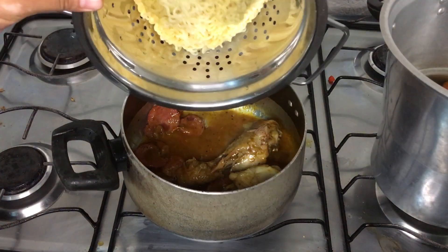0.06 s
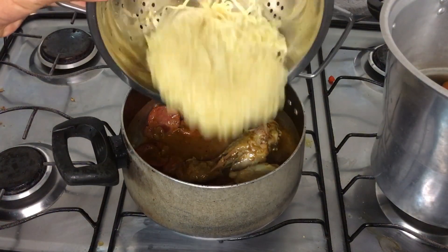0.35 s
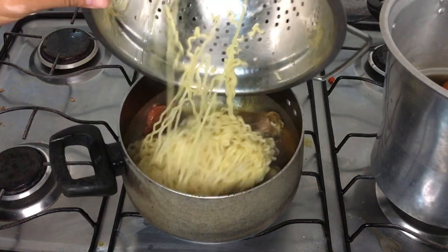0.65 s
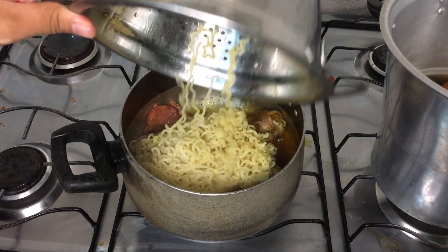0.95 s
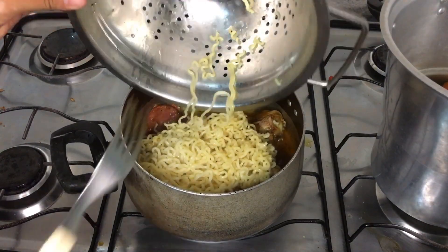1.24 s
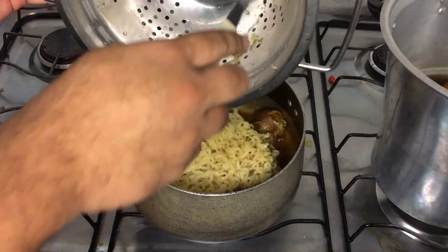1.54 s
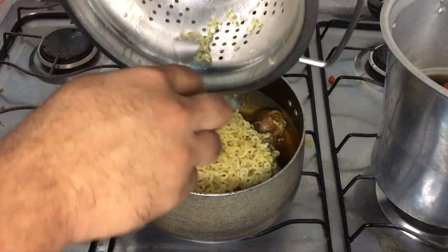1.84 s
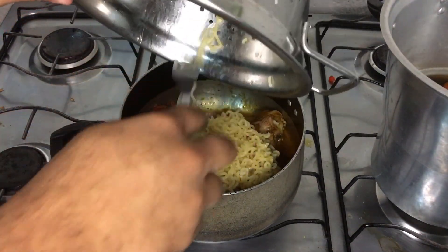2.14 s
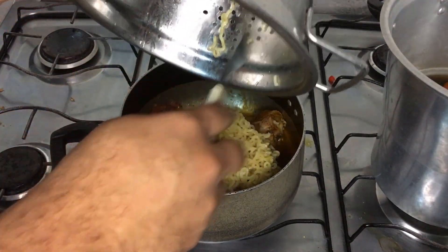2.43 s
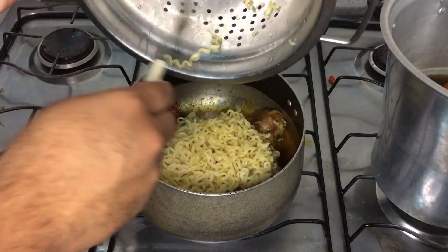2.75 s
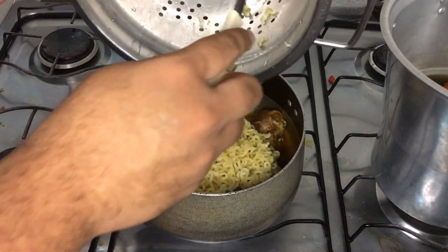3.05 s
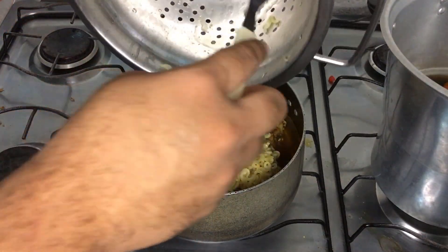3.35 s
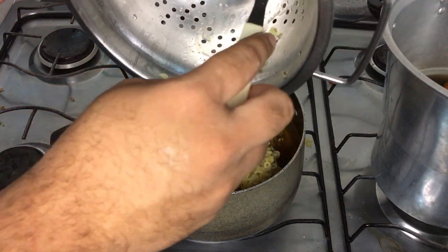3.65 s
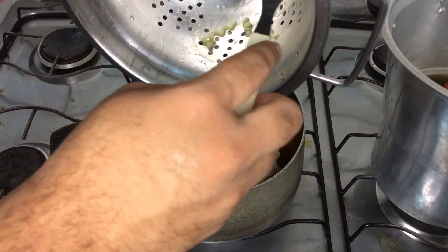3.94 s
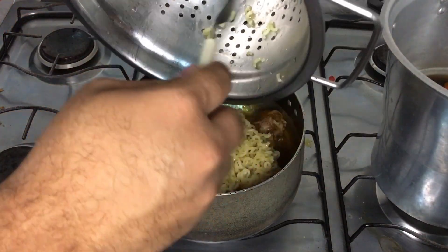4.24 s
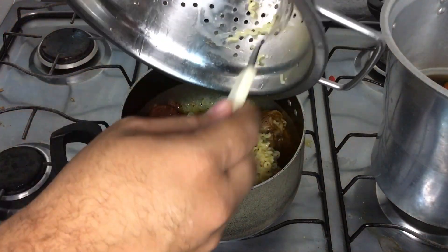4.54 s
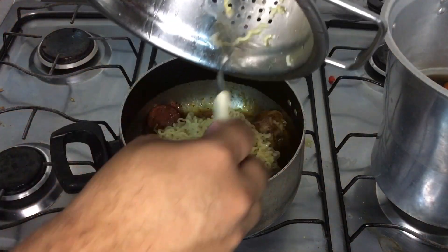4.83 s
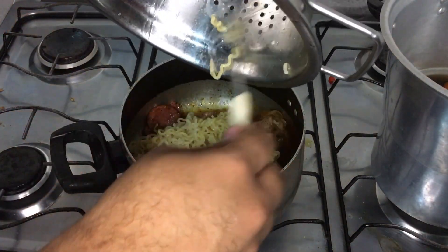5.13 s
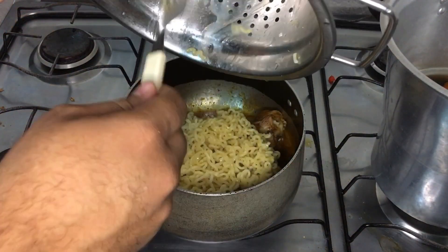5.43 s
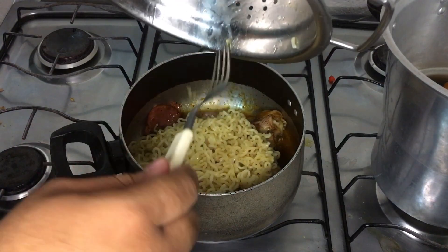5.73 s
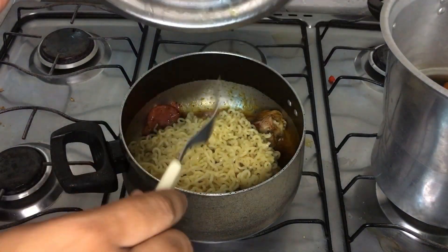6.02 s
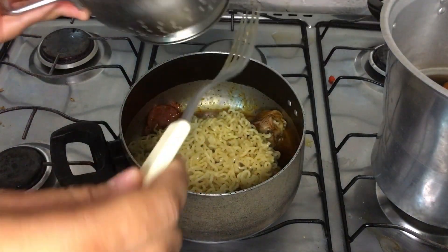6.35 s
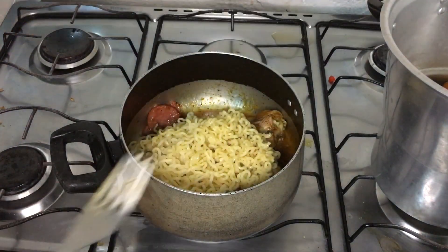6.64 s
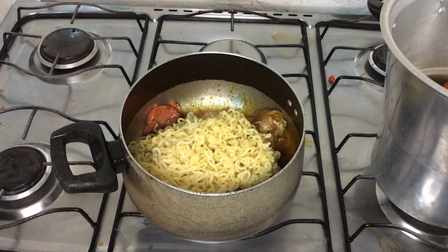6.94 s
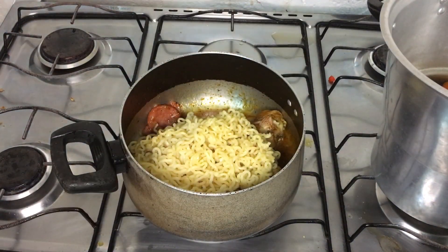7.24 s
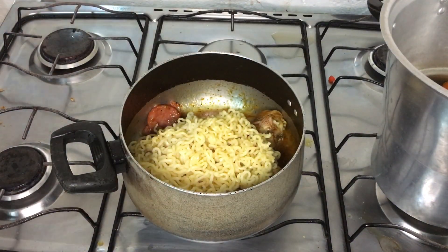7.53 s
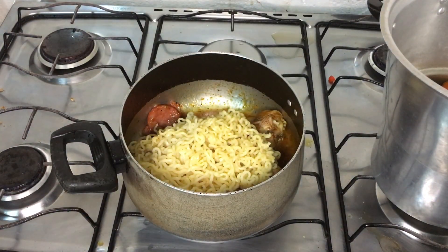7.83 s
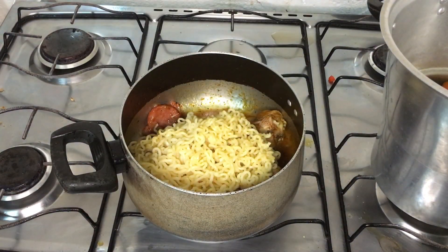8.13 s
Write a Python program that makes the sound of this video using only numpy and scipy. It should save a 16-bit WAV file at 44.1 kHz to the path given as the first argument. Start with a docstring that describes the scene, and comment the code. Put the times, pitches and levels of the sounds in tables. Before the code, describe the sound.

Wet noodles plop into a pot, then a fork taps and scrapes a ringing steel colander over a faint gas burner.

```python
"""Noodles from colander to pot

Small kitchen, gas stove. A steel colander knocks on the pot; cooked noodles slide in and land as one
wet lump, and the stove top booms. A fork taps and scrapes the last strands loose, ringing the steel's
modes. The colander is set on the counter and rocks. Behind: burner, simmer, cloth, faint chirps."""
import sys
import numpy as np
from scipy import signal
from scipy.fft import rfft, irfft
from scipy.io import wavfile
from scipy.ndimage import uniform_filter1d

SR = 44100
rng = np.random.default_rng(int(sys.argv[2]) if len(sys.argv) > 2 else 0)


def dump(signal):
    """Clip the signal to [-1, 1] and save it as 16-bit WAV at the path in sys.argv[1]."""
    limited = np.clip(np.atleast_2d(signal).T, -1, 1)
    pcm = np.round(limited * 32767).astype(np.int16)
    wavfile.write(sys.argv[1], SR, pcm)


N = 369558
RING_T = np.arange(int(.7 * SR)) / SR

# Blows on steel: (time [s], strength [dB], contact pitch [Hz], wall gain [dB], low gain [dB],
# rim gain [dB], wall resonance [Hz], treble resonance [Hz])
FORK_TAPS = [(1.634, -24.5, 8550, -2.5, 0.5, -10, 3130, 6830), (1.669, -33, 9000, 6, 4.5, -7, 3350, 7130),
             (1.768, -28.5, 12200, 5.5, -2, -9, 4170, 11500), (1.804, -16, 9900, 5.5, 4, -2, 5500, 8140),
             (1.86, -28, 10600, -4, -9.5, -8, 3250, 8600), (2.064, -23, 9400, -8, 4, -16.5, 3700, 6100),
             (2.152, -18, 9800, 7.5, -1, -3, 4700, 6900), (2.159, -21.5, 8000, 6.5, -6, -10, 5140, 7030),
             (2.216, -20.5, 9800, 8.5, 3, -10, 2160, 11100), (2.441, -23, 8600, -9, 0, -22, 3400, 8300),
             (2.489, -17.5, 9100, 6, -3, -22, 3240, 9100), (2.524, -22.5, 6400, 7, 12, -13.5, 4030, 6200),
             (2.792, -20.5, 6340, -3.5, 6.5, -20, 3480, 7000), (3.208, -25, 7800, -7, 8, -14, 2930, 7960),
             (3.264, -35.5, 9700, -1.5, -12, -16, 2100, 6440),
             (3.491, -24.5, 8900, 1, 4.5, -11, 5250, 9100), (3.577, -22.5, 10500, 1, -10, -23, 3130, 9100),
             (3.783, -28, 10200, 3.5, 15, -6, 2480, 8200), (3.79, -29.5, 8140, 12, 6, -3, 3280, 7240),
             (3.796, -27.5, 9600, 2, 7, 9, 2400, 7400), (4.142, -18, 11100, -3, 0.5, -22, 3400, 11800),
             (4.445, -20, 9600, -9, -4, -4, 3250, 8330), (4.463, -23, 11700, -0.5, -11, -4, 4330, 8800),
             (4.547, -24.5, 8640, -7, -3.5, 11, 4270, 8900), (4.69, -26.5, 9300, -4, -8, 7, 3060, 9000),
             (4.762, -31, 11500, -2, -24, 0, 3080, 8850), (4.859, -17.5, 7170, -5, 5, -14, 2050, 6050),
             (5.102, -13.5, 9900, 14.5, 11.5, 6.5, 4000, 11600),
             (5.276, -40.5, 7000, -2, -12, 0, 4030, 6870), (5.545, -18.5, 7460, 1.5, -4, 5.5, 4100, 8700),
             (5.656, -29.5, 8000, 3, -17, 15, 2900, 7300)]
POT_KNOCKS = [(0.007, -29, 8750, 5.5, -5, 8.5, 4030, 6000), (0.06, -42.5, 9350, 8, 3, 9, 3960, 6850),
              (0.16, -38, 9600, -6, -1, 3, 2130, 6600), (0.439, -51, 10000, 1, -8, 8, 2665, 9000),
              (0.49, -32.5, 7400, 5.5, -1, 0, 3000, 7100)]
SETTLING_KNOCKS = [(8.061, -48, 9400, 1, 4, 0, 5170, 9100), (8.248, -42.5, 10000, -2, -4, 9, 3960, 9150),
                   (8.315, -45.5, 10000, -5, -5, 2, 2050, 8800), (8.358, -52, 10500, 2, -3, -3, 2100, 8900)]
# Edges of five registers, low, wall and three treble: (frequency [Hz])
REGISTER_EDGES_HZ = [150, 1700, 5500, 7800, 10500, 17000]
# Average blow, per register: (level [dB])
FORK_BALANCE_DB = [-24.5, -12.5, -1.5, 1, 1]
POT_BALANCE_DB = [10.5, 2.5, -1, 0.5, 0.5]
SETTLING_BALANCE_DB = [2, 4, -2, 1, 0.5]
# Hand jabs and damps, then flicks along the rim: (time [s], push [dB], root of damping t60 factor [-])
FORK_HAND = [(1.8, 1.5, 0.29), (2.06, 7.5, 0.77), (2.5, 2, 1.0), (2.8, 5, 0.59), (3.2, 10, 0.26),
             (3.58, -2, 0.16), (3.8, 12, 0.22), (4.45, -10, 0.28), (4.6, -23, 0.33), (5.1, -3, 0.53),
             (5.55, -6, 1.0)]
# Tines over the holes: (start [s], end [s], level [dB], wall gain [dB])
SCRAPE_STROKES = [(1.662, 1.701, -42.5, 11.5), (1.715, 1.772, -37.5, 7), (1.836, 1.911, -37.5, -21),
                  (2.091, 2.225, -36, 0), (2.455, 2.55, -32.5, 3), (2.847, 2.938, -44, 4),
                  (3.225, 3.264, -37, -10), (4.153, 4.205, -41, -12), (4.484, 4.555, -40.5, -7),
                  (4.721, 4.93, -39, -4), (5.203, 5.297, -41.5, -6), (5.594, 5.654, -42, 0)]
# Wet steel squeak: (time [s], level [dB])
SQUEAK_ENVELOPE = [(1.68, -73), (1.72, -61), (1.755, -40.5), (1.79, -58.5)]
# Sauce smacks: (time [s], relative level [dB], frequency [Hz])
SAUCE_SMACKS = [(0.463, -40, 2600), (0.608, -26, 2300), (0.695, -24, 2800), (0.713, -24, 3700),
                (0.725, -20, 1010), (0.727, -24, 258), (0.775, -25.5, 2200), (0.8124, -32, 1900),
                (0.963, -36.5, 6400)]
# Cook's movements: (start [s], length [s], level [dB], peak [Hz])
COOK_MOVES = [(1.372, 0.38, -54.5, 1640), (6.171, 0.36, -54.5, 1560), (6.742, 0.27, -61, 1500),
              (7.174, .2, -61, 2500), (7.597, 0.32, -64.5, 1500)]

# Clear modes of the vessels: (frequency [Hz], level [dB], t60 [s])
COLANDER_MODES = [(700, -1, .25), (780, 1, .3), (886, 8, .65), (1037, 3, .4), (1233, 7, .55),
                  (1830, -1, .55), (2024, 4, .55), (2307, 9, .22), (2426, 8, .2), (2449, 9, .28),
                  (2900, 3, .65), (3500, 6, .35), (3988, 6, .25), (4015, 3, .9), (4130, 2, .5),
                  (4662, 0, .2), (5150, 6, .18), (5576, 3, .26), (5845, 5, .28), (6088, 9, .42),
                  (6160, 4, .22), (6430, 9, .25), (6815, 9, .28), (7060, 13, .32), (8127, 6, .28),
                  (8600, 7, .2), (9060, 5, .18), (10798, 6, .25), (11458, 5, .25), (13680, 5, .25)]
POT_MODES = [(400, 0, .7), (535, 1, .8), (695, -3, .4), (868, 2, .55), (1020, 4, .4), (1110, 2, .3),
             (1322, 2, .35), (1361, 6, .45), (1420, 8, .35), (1675, 3, .35), (2030, 5, .35), (2665, 3, .45),
             (2902, 7, .3), (3005, 9, .13), (3105, 9, .16), (4001, 3, .35), (4694, -1, .15), (5103, 9, .34),
             (5300, 8, .35), (5540, 4, .3), (6288, 9, .2), (6850, 10, .2)]
RESTING_MODES = [(1000, 3, .3), (1370, 3, .2), (1560, -10, .12), (2070, 0, .25), (2320, -5, .3),
                 (4200, -10, .15), (5420, -14, .15)]  # colander on the counter
# Their crowds of short-lived modes: (frequency [Hz], level [dB])
COLANDER_SPECTRUM = [(150, -17), (500, -17), (850, 0), (1600, -3.5), (2300, 0), (2700, -1.5), (3200, 3.5),
                     (3750, -2), (4100, 0.5), (5500, 1), (6200, 13.5), (7000, 12), (7800, 0), (8800, 10.5),
                     (10300, -1.5), (16000, 2)]
POT_SPECTRUM = [(150, -21), (450, 6.5), (700, 7), (1000, 4), (1450, 6.5), (2250, 1), (2650, 4), (3050, -1),
                (3300, 2.5), (3950, 7.5), (4450, 3), (4900, 3), (5200, 8.5), (5900, 10), (6750, 15.5),
                (7800, -9.5), (8800, -7.5), (16000, -20)]
RESTING_SPECTRUM = [(150, -1), (600, 0), (1100, 3), (1500, 4), (1800, -4), (2250, 10.5), (2700, 3),
                    (4000, 2), (6000, -7), (9000, -3), (16000, -5)]
# Low body modes: (frequency [Hz], level [dB], t60 [s])
JAB_MODES = [(177, -2.5, 0.07), (253.5, -6.5, 0.28), (294, -4, 0.14), (355, -5.5, 0.13), (407.8, -9, 0.35),
             (537, -11.5, 0.15), (693, -3.5, 0.19)]
STOVE_MODES = [(60, -19, 0.46), (94.85, 0, 2), (140, -9, 4), (207.2, -1.5, 1.44), (242.7, -8.5, 1.6),
               (322, -34, 0.92), (400.4, -7.5, 0.59)]
COUNTER_MODES = [(76.2, 1, 0.63), (96, -0.5, 0.44), (122, -7.5, 0.53), (149, -3.5, 0.44), (236, -11, 0.29)]
FULL_POT_MODES = [(90, 2, 0.35), (219, -9, 0.22), (302, -17, 0.33), (409, -9, 0.37), (543, -8, 0.46),
                  (980, -16, 0.51), (1120, -8.5, 0.37)]
# Blows that drive them: (time [s], level [dB])
FORK_JABS = [(1.803, -52), (2.063, -44.5), (2.441, -53), (3.208, -47), (3.491, -48.5), (3.785, -39.5),
             (4.142, -46.5), (4.445, -50.5), (4.86, -51.5)]
STOVE_BLOWS = [(0.006, -39.5), (0.157, -40), (0.49, -37), (0.714, -36.5)]
COUNTER_BLOWS = [(8.075, -38.5), (8.26, -35.5)]
LUMP_BLOW = [(0.715, -29.5)]
# Noise spectra: (frequency [Hz], level [dB])
THUD_SPECTRUM = [(110, -32), (200, -14.5), (290, -6.5), (420, -14), (550, -15), (720, -21), (1000, -36),
                 (3000, -55)]
NOODLE_SPECTRUM = [(24, -75), (40, 3), (135, 7.5), (182, -3), (216, 2), (541, -7), (597, -7), (1110, -9.5),
                   (1350, -11), (4000, -15.5), (15000, -24)]
CLOTH_SPECTRUM = [(100, -20), (500, -4.5), (1400, -3.5), (3400, -1), (5000, -6), (6500, -6.5), (12000, -7),
                  (16000, -18)]
FLAME_SPECTRUM = [(18, -52), (30, -31.5), (59, 6), (77, -7), (93, -17), (335, -8.5), (362, -17),
                  (523, -15.5), (816, -16.5), (1380, -18), (2500, -23.5), (4860, -29), (6300, -23.5),
                  (8000, -26.5), (9860, -22), (14200, -12.5), (15800, -18.5)]
SLIP_SPECTRUM = [(200, -2.5), (1500, -9), (4500, -8.5), (6200, -6), (9000, 6.5), (12000, 9), (16000, 3.5)]
# Decay: (frequency [Hz], t60 [s])
CROWD_MIN_T60 = [(300, 0.2), (2500, 0.092), (6500, 0.076), (16000, 0.075)]
KITCHEN_T60 = [(100, 0.57), (600, 0.83), (2000, 0.52), (6000, 0.45), (15000, 0.23)]


def strikes(rows, modes, balance_db, level_db, crack_db, crack_t60_s, damping_t60_s, thud_db, thud_t60_s,
            hand=None):
    """Blows on steel: contact crack, damped ring, dull thud of the hand's push."""
    out = np.zeros(N)
    _, _, spectrum = modes
    for time_s, strength_db, pitch_hz, wall_db, low_db, rim_db, wall_hz, treble_hz in rows:
        push_db, hold = hand(time_s) if hand else (0, 1)
        crack = amp(crack_db + push_db) * burst(spectrum, crack_t60_s)
        blow = crack + spot_ring(modes) * fade(RING_T, damping_t60_s * hold ** 2)
        blow = resonance(blow, hz=2385, width_hz=230, gain_db=rim_db)
        blow = resonance(blow, wall_hz, width_hz=180, gain_db=8.5)
        tilt_db = 13.5 * np.log2(pitch_hz / 9270)  # shorter contact, brighter treble
        levels_db = np.add(balance_db, [low_db, wall_db, -tilt_db, 0, tilt_db])
        ring = 0
        for lo_hz, hi_hz, db in zip(REGISTER_EDGES_HZ, REGISTER_EDGES_HZ[1:], levels_db):
            register = band(blow, lo_hz, hi_hz, order=8)
            ring = ring + amp(db) * register / rms(register[:SR // 50])
        ring = resonance(ring, treble_hz, width_hz=360, gain_db=5.5)
        add(out, time_s, amp(level_db + strength_db) * ring)
        add(out, time_s, amp(thud_db + (strength_db + push_db) / 2) * burst(THUD_SPECTRUM, thud_t60_s))
    return out


def vessel_modes(clear_modes, spectrum, clear_db, count=560):
    """Thin steel, one decaying sine a row. Returns clear modes, short-lived crowd, crowd spectrum."""
    crowd_hz = np.linspace(200, 16400, count) + rng.uniform(-20, 20, count)
    crowd_t60_s = lookup(CROWD_MIN_T60, crowd_hz) * 2 ** rng.uniform(0, 0.96, count)
    crowd = np.column_stack([crowd_hz, lookup(spectrum, crowd_hz), crowd_t60_s])
    clear = np.add(clear_modes, [0, clear_db, 0])
    hz, db, t60_s = np.vstack([clear, crowd]).T[:, :, None].astype(np.float32)
    t = RING_T.astype(np.float32)
    sines = (amp(db) * fade(t, t60_s)).astype(np.float32) * np.sin(np.float32(2 * np.pi) * hz * t)
    return sines[:len(clear)], sines[len(clear):], spectrum


def spot_ring(modes):
    """Ring of one spot: each mode is hit nearer to or further from a node; neighbours go together."""
    clear, crowd, _ = modes
    narrow = uniform_filter1d(rng.standard_normal(len(crowd)), size=7)
    clear_db = rng.uniform(-3, 3, len(clear))
    crowd_db = 4 * rng.standard_normal(len(crowd)) + 6 * np.tanh(narrow / rms(narrow))
    broad = uniform_filter1d(rng.standard_normal(len(crowd)), size=30)
    crowd_db += 5.5 * np.tanh(broad / rms(broad))
    ring = 0
    for db, sines in [(clear_db, clear), (crowd_db, crowd)]:
        signs = rng.choice([-1, 1], len(db))
        ring = ring + (signs * amp(db)).astype(np.float32) @ sines
    return ring / rms(ring[:SR // 100])


def fork_hand(time_s):
    """The hand's push on the fork, and how freely it lets the colander ring."""
    times_s, push_db, hold = np.transpose(FORK_HAND)
    return np.interp(time_s, times_s, push_db), np.interp(time_s, times_s, hold)


def scrapes(modes, grit_db=9, catch_db=10):
    """Tines stick, slip and catch in the holes; mostly high modes, unless they bear on the wall."""
    out = np.zeros(N)
    for start_s, end_s, stroke_db, wall_db in SCRAPE_STROKES:
        count = int((end_s - start_s) * SR)
        slips = clicks(SR, per_s=1500, spread_db=4)
        catches = amp(catch_db) * clicks(SR, per_s=110, spread_db=4)
        ring = spot_ring(modes)
        ring[0] += amp(grit_db)  # direct click
        spectrum = [(hz, db + wall_db * (hz < REGISTER_EDGES_HZ[2])) for hz, db in SLIP_SPECTRUM]
        rasp = signal.fftconvolve((slips + catches)[:count], ring)
        rasp = coloured(np.pad(rasp, (0, SR - count)), spectrum)
        add(out, start_s, amp(stroke_db) * rasp / rms(rasp[:count]))
    return out


def noodles(land_s=0.733, land_db=-36.5, rise_s=0.054, slide_db=-44, smack_db=-7):
    """Soft strands slide, land as one lump and trail off; pockets of sauce smack open."""
    t = np.arange(N) / SR - land_s
    before_s, after_s = np.minimum(t, 0), np.maximum(t, 0)
    strands = coloured(clicks(N, per_s=1500, spread_db=1.3), NOODLE_SPECTRUM)
    out = amp(slide_db) * fade(after_s, t60_s=2.5) * band(strands, 30, 1500)
    out += amp(land_db) * np.exp(before_s / rise_s) * fade(after_s, t60_s=0.48) * strands
    for time_s, db, hz in SAUCE_SMACKS:
        smack = band(rng.standard_normal(len(RING_T)), hz / 1.66, hz * 1.23)
        add(out, time_s, amp(db + smack_db) * smack / rms(smack) * fade(RING_T, t60_s=0.037))
    return out


def squelch(level_db=-41, fall_db=11, span_s=0.19, low_hz=280, high_hz=1600, rise=0.11, count=26):
    """Air squeezed from under the lump pops in bubbles, each rising in pitch as it dies."""
    out = np.zeros(N)
    for lateness, smallness in rng.random((count, 2)):
        hz = low_hz * (high_hz / low_hz) ** smallness
        t60_s = 32 / hz
        glide_hz = hz * (1 + rise * np.minimum(RING_T / t60_s, 1))
        bubble = np.sin(2 * np.pi * np.cumsum(glide_hz) / SR) * fade(RING_T, t60_s)
        add(out, LUMP_BLOW[0][0] + lateness * span_s, amp(level_db - fall_db * lateness) * bubble)
    return out


def boom(modes, blows, rise_s):
    """Heavy, soft blows set a panel's low modes swinging."""
    t, out = np.arange(2 * SR) / SR, np.zeros(N)
    for time_s, blow_db in blows:
        swing = sum(amp(db) * fade(t, t60_s) * np.sin(2 * np.pi * (hz * t + rng.random()))
                    for hz, db, t60_s in modes)
        add(out, time_s, amp(blow_db) * swing * (1 - np.exp(-t / rise_s)))
    return out


def rocking(start_s=8.255, level_db=-52, rocks_per_s=19, bend=0.021):
    """The colander rocks on its foot; the rolling contact bends its ring up and down."""
    out, grit = np.zeros(N), rng.standard_normal(len(RING_T))
    ring = sum(amp(db) * around(grit, hz, width_hz=35) for hz, db, _ in RESTING_MODES)
    position = np.cumsum(1 + bend * np.cos(2 * np.pi * rocks_per_s * RING_T))
    wobble = np.interp(position, np.arange(len(ring)), ring) / rms(ring)
    add(out, start_s, amp(level_db) * fade(RING_T, t60_s=1.3) * wobble)
    return out


def squeak():
    """Wet steel squeaks as the fork goes in."""
    tone = around(rng.standard_normal(N), hz=4200, width_hz=350, order=2)
    level_db = np.interp(np.arange(N) / SR, *np.transpose(SQUEAK_ENVELOPE), left=-120, right=-120)
    return amp(level_db) * tone / rms(tone)


def kitchen(x, first_s=0.002):
    """Dense reflections off hard walls; treble dies first."""
    echoes = clicks(len(RING_T), per_s=4000, spread_db=1.64) * (RING_T > first_s)
    hz, t, frames = signal.stft(echoes, SR, nperseg=256)
    _, tail = signal.istft(frames * fade(t, lookup(KITCHEN_T60, hz)[:, None]), SR, nperseg=256)
    return signal.oaconvolve(x, tail / np.linalg.norm(tail))[:N]


def burner(flame_db=-54, simmer_db=-73):
    """Steady flame murmur and hiss; faint pops of simmering sauce."""
    pop = rng.standard_normal(len(RING_T)) * fade(RING_T, t60_s=0.012)
    pops = signal.oaconvolve(clicks(N, per_s=18, spread_db=3), pop)[:N]
    simmer = band(pops, 1400, 12000)
    flame = coloured(rng.standard_normal(N), FLAME_SPECTRUM)
    return amp(flame_db) * flame + amp(simmer_db) * simmer / rms(simmer)


def swishes():
    """Cloth and soles: dense tiny slips swell and fade with each of the cook's movements."""
    out, t = np.zeros(N), np.arange(SR) / SR
    for start_s, length_s, db, peak_hz in COOK_MOVES:
        rub = coloured(clicks(SR, per_s=4000, spread_db=2), CLOTH_SPECTRUM)
        rub += amp(5) * around(rub, peak_hz, width_hz=450)
        swell = np.sin(np.pi * np.minimum(t / length_s, 1)) ** 2
        add(out, start_s, amp(db) * swell * rub / rms(rub))
    return out


def chirps(level_db=-71, offset_s=0.21, period_s=0.447, rise_s=0.013, hold_s=0.09):
    """Thin, evenly spaced chirps, like a far-off cricket."""
    t = (np.arange(N) / SR - offset_s) % period_s
    tone = around(rng.standard_normal(N), hz=6020, width_hz=130, order=2)
    envelope = np.minimum(t / rise_s, 1) * fade(np.maximum(t - hold_s, 0), t60_s=0.5)
    return amp(level_db) * envelope * tone / rms(tone)


def amp(db):
    return 10 ** (np.asarray(db) / 20)


def rms(x):
    return np.sqrt(np.mean(x ** 2) + 1e-20)


def fade(t, t60_s):
    return np.exp(-np.log(1000) * t / np.maximum(t60_s, 1e-3))


def lookup(table, hz):
    """Interpolate on a log-frequency axis."""
    table_hz, values = np.transpose(table)
    return np.interp(np.log(hz + 1), np.log(table_hz + 1), values)


def add(mix, start_s, sound):
    part = mix[round(start_s * SR):][:len(sound)]
    part += sound[:len(part)]


def band(x, lo_hz, hi_hz, order=1):
    return signal.sosfilt(signal.butter(order, [lo_hz, hi_hz], "band", fs=SR, output="sos"), x)


def around(x, hz, width_hz, order=1):
    return band(x, hz - width_hz / 2, hz + width_hz / 2, order)


def resonance(x, hz, width_hz, gain_db):
    """Boost or cut one narrow band."""
    return x + (amp(gain_db) - 1) * around(x, hz, width_hz)


def coloured(x, spectrum):
    """x shaped by a spectrum, at rms 1."""
    gain = amp(lookup(spectrum, np.fft.rfftfreq(len(x), 1 / SR)))
    shaped = irfft(rfft(x) * gain, len(x))
    return shaped / rms(shaped)


def burst(spectrum, t60_s):
    """Decaying coloured noise."""
    return coloured(rng.standard_normal(len(RING_T)), spectrum) * fade(RING_T, t60_s)


def clicks(samples, per_s, spread_db):
    """Random clicks, a few larger than the rest."""
    size = amp(spread_db * np.minimum(rng.exponential(1, samples), 4))
    return size * rng.choice([-1, 1], samples) * (rng.random(samples) < per_s / SR)


def scene():
    """Fork, pot and counter, close by in the kitchen. Mono."""
    colander = vessel_modes(COLANDER_MODES, COLANDER_SPECTRUM, clear_db=1)
    pot = vessel_modes(POT_MODES, POT_SPECTRUM, clear_db=12)
    fork = strikes(FORK_TAPS, colander, FORK_BALANCE_DB, level_db=-8.5, crack_db=-7.5,
                   crack_t60_s=0.0032, damping_t60_s=2.3, thud_db=-43.5, thud_t60_s=0.17, hand=fork_hand)
    fork += boom(JAB_MODES, FORK_JABS, rise_s=0.0014) + scrapes(colander) + squeak()
    pouring = strikes(POT_KNOCKS, pot, POT_BALANCE_DB, level_db=-3.5, crack_db=3.5,
                      crack_t60_s=0.054, damping_t60_s=0.33, thud_db=-27.5, thud_t60_s=0.42)
    pouring += noodles() + squelch()
    resting = vessel_modes(RESTING_MODES, RESTING_SPECTRUM, clear_db=2, count=300)
    settling = strikes(SETTLING_KNOCKS, resting, SETTLING_BALANCE_DB, level_db=-7.5, crack_db=-3,
                       crack_t60_s=0.055, damping_t60_s=0.22, thud_db=-30.5, thud_t60_s=0.27)
    settling += rocking()
    panels = boom(STOVE_MODES, STOVE_BLOWS, rise_s=0.0042)
    panels += boom(COUNTER_MODES, COUNTER_BLOWS, rise_s=0.0014)
    panels += boom(FULL_POT_MODES, LUMP_BLOW, rise_s=0.0083)
    room = kitchen(amp(-11) * fork + amp(-8.5) * pouring + amp(-2.5) * settling)
    return (fork + pouring + settling + panels + room + burner() + swishes() + chirps())[None]


def record(dry, bass_cut_hz=40, edge_hz=15850):
    """Microphone bass cut, then band limit."""
    thinned = signal.sosfilt(signal.butter(2, bass_cut_hz, "high", fs=SR, output="sos"), dry)
    lowpass = signal.firwin(511, edge_hz, window=("kaiser", 9), fs=SR)
    return signal.oaconvolve(thinned, lowpass[None], "same")


dry = scene()
out = record(dry)
dump(out)
```